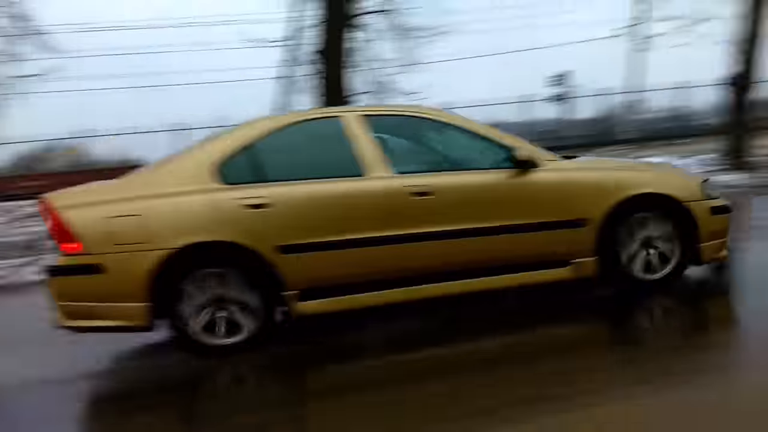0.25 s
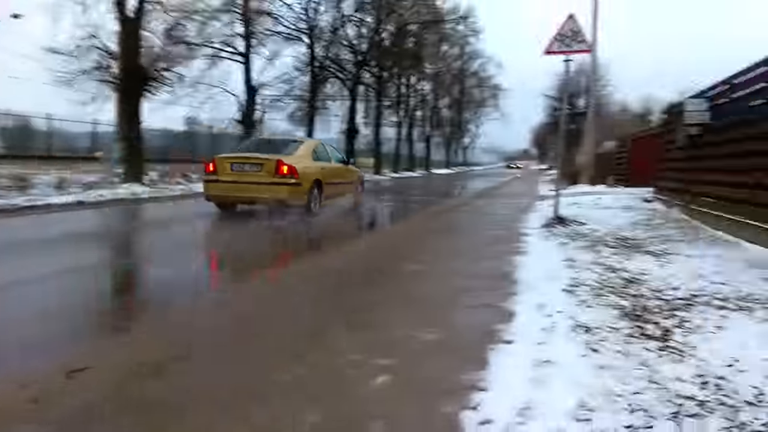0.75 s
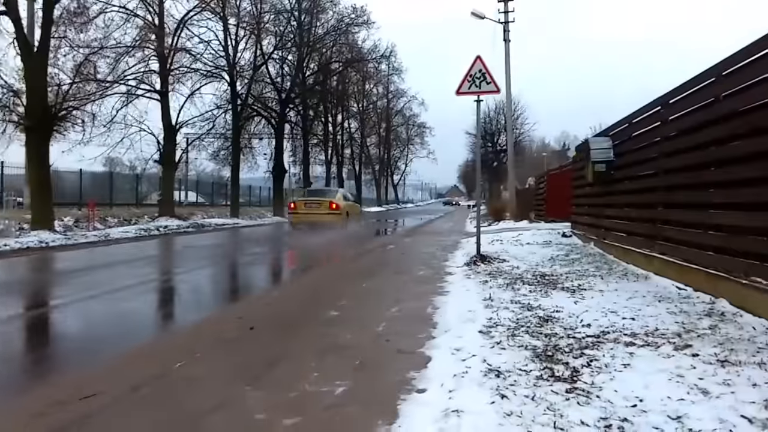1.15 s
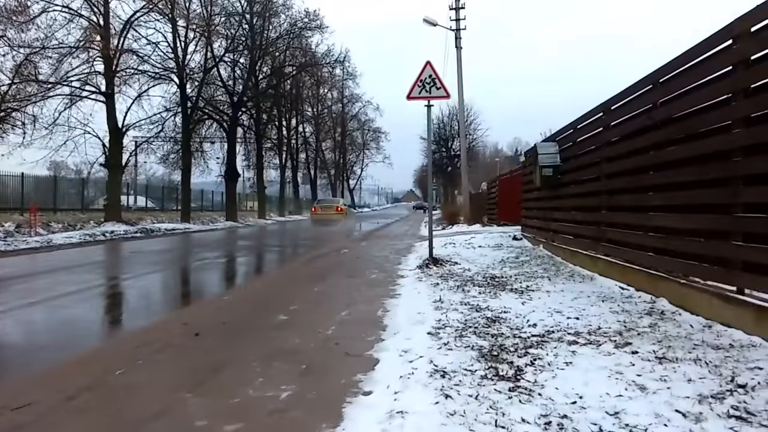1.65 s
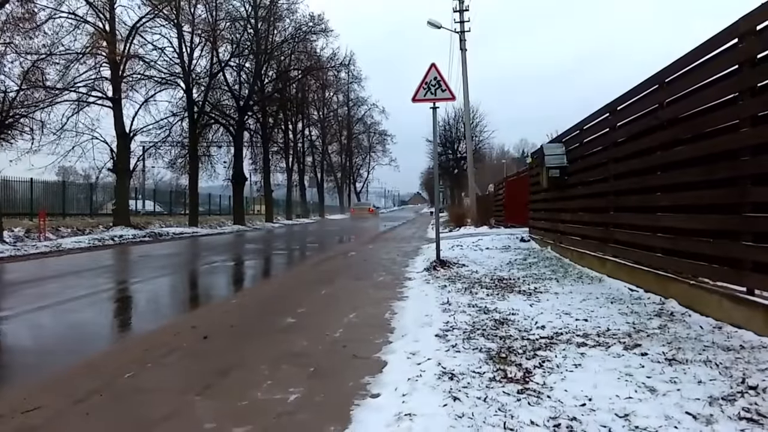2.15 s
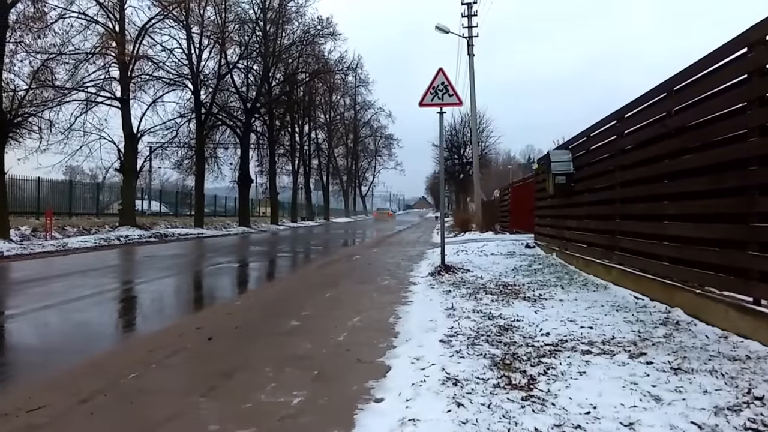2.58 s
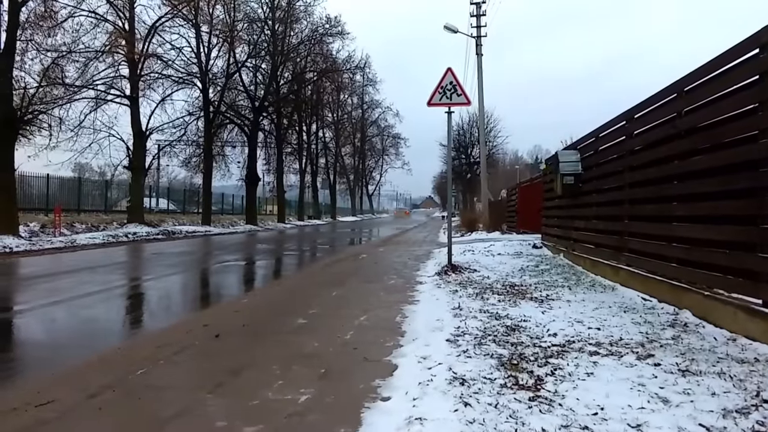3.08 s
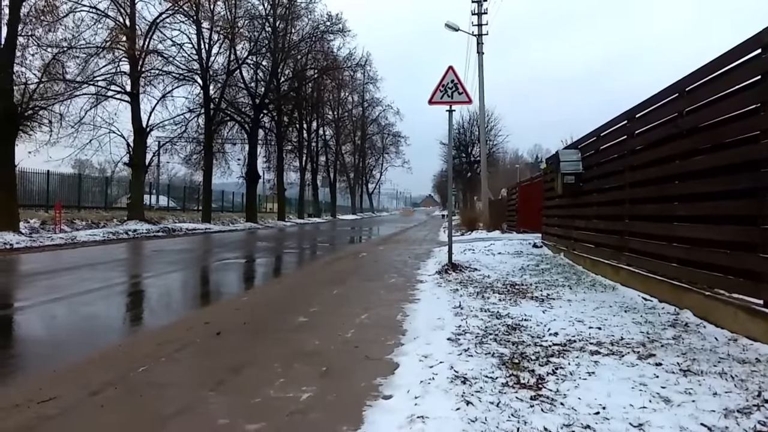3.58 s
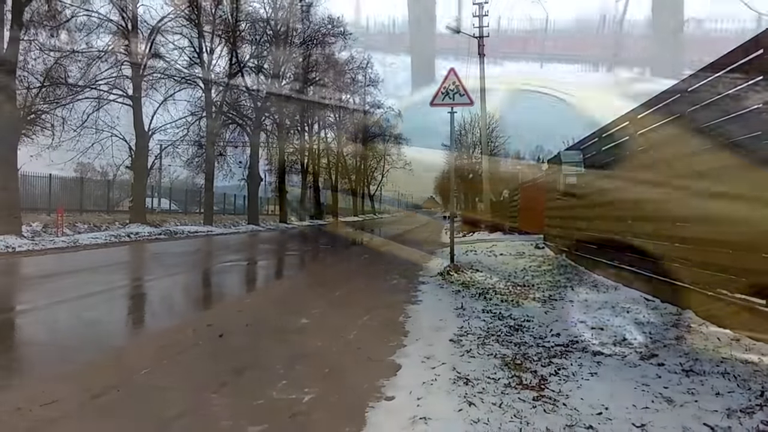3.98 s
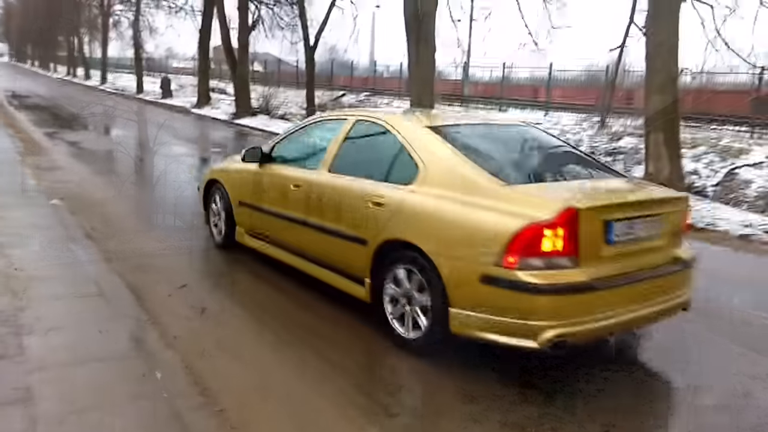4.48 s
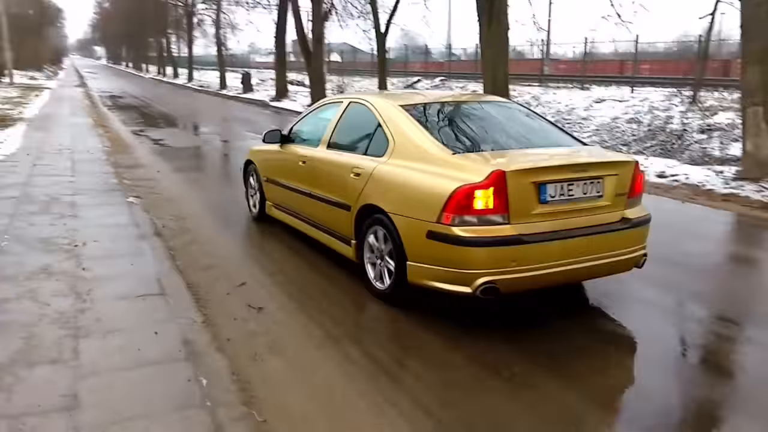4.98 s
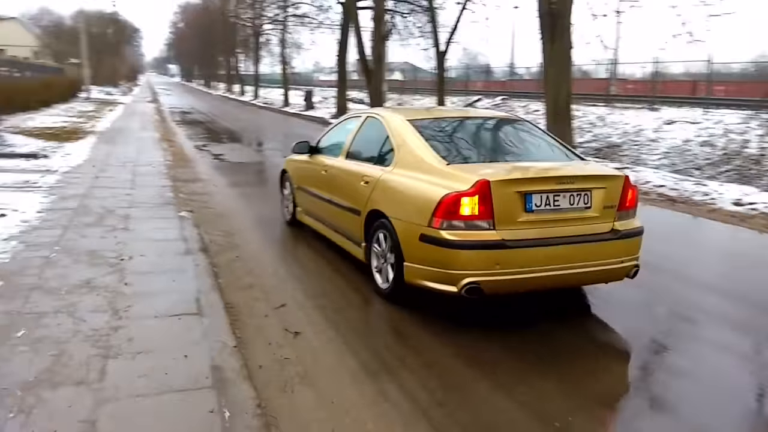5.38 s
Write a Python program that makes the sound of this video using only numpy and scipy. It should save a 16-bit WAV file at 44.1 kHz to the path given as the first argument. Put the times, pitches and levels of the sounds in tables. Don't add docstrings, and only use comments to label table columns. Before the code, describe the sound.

Outdoors on a wet roadside, a five-cylinder diesel with an open exhaust passes a few metres from the microphone with tyre spray and a loud growl. Its pitch dips, then climbs as it accelerates away, raspier and duller, until the throttle lifts. Wind buffets the microphone, and the sound crossfades to the car close up, idling and revving hard.

```python
import sys
import numpy as np
from scipy import signal
from scipy.io import wavfile
from scipy.ndimage import uniform_filter1d, map_coordinates

SR = 44100
rng = np.random.default_rng(int(sys.argv[2]) if len(sys.argv) > 2 else 0)


def field_ratio(decibels):
    return 10 ** (np.asarray(decibels, dtype=float) / 20)


def store_pcm(level_fs):
    pcm = np.round(np.clip(level_fs, -1, 1) * 32767).astype(np.int16)
    wavfile.write(sys.argv[1], SR, np.atleast_2d(pcm).T)


N = 248280

AWAY_S, AWAY_LENGTH_S = .75, .5
LIFT_S = 3.3
BEND_S = 4.1


def evened(x):
    return x / np.sqrt(np.mean(x ** 2) + 1e-20)


def read(points, hz):
    f, value = np.transpose(points)
    return np.interp(np.log(hz + 1), np.log(f + 1), value)


def curves(rows, t=None):
    s, *columns = np.transpose(rows)
    at = np.arange(N) / SR if t is None else t
    return [np.interp(at, s, c) for c in columns]


def bump(s, wide_s):
    return np.exp(-((np.arange(N) / SR - s) / wide_s) ** 2)


def ramp(s, length_s):
    return np.clip((np.arange(N) / SR - s) / length_s, 0, 1)


def sine(turns):
    return np.sqrt(2) * np.sin(2 * np.pi * turns)


def resonate(x, hz, width):
    turn = np.exp(2j * np.pi * np.cumsum(hz * np.ones(N)) / SR)
    r = np.exp(-np.pi * width / SR)
    return 2 * (turn * signal.lfilter([1 - r], [1, -r], x / turn)).real


def noise(spectrum, patchy_db, flicker_db):
    frames, hz = N // 256 + 5, np.fft.rfftfreq(1024, 1 / SR)
    patches = uniform_filter1d(rng.standard_normal((frames, 513)), size=20, axis=0)
    patches = evened(uniform_filter1d(patches, size=8, axis=1))
    flicker = evened(uniform_filter1d(rng.standard_normal((frames, 1)), size=7, axis=0))
    z = rng.standard_normal((2, frames, 513)) + 1j * rng.standard_normal((2, frames, 513))
    z = z * field_ratio(read(spectrum, hz) + patchy_db * patches + flicker_db * flicker)
    return evened(signal.istft(z.transpose(0, 2, 1), nperseg=1024, noverlap=768)[1][:, :N])


def wind():
    # (time [s], peak [dB], length [s])
    gust_table = [(0.133, -36.5, 0.18), (0.796, -49, 0.048), (1.258, -44, 0.17), (1.462, -43, 0.052),
                  (1.716, -44, 0.21), (2.3, -54.5, 0.23), (3.145, -52, 0.021), (4.05, -49, 0.24),
                  (4.346, -45, .17), (4.62, -43, .1), (4.86, -47, 0.2), (5.194, -58, 0.23),
                  (5.422, -59, 0.14)]
    gusts = field_ratio(-70) + sum(field_ratio(db) * bump(s, length) for s, db, length in gust_table)
    rumble = [(25, -32), (70, 4.5), (140, -5.5), (300, -14.5), (500, -51), (1000, -74)]  # (Hz, dB)
    return gusts * field_ratio(7.5) * noise(rumble, 0.2, 1.8)


def buffets():
    # (time [s], peak [dB], frequency [Hz])
    buffet_table = [(1.81, -40, 75), (1.995, -46, 140), (2.05, -46, 140), (2.155, -47, 120),
                    (2.325, -41, 120), (2.46, -42, 100), (2.62, -46, 120), (2.765, -42, 140),
                    (3.04, -46, 130), (3.15, -45, 110), (3.555, -47, 115), (3.765, -47, 110),
                    (4.198, -28, 130), (4.234, -25, 100), (4.272, -22, 105), (4.3545, -19, 210),
                    (4.376, -19, 260), (4.3865, -24, 200), (4.3965, -22, 230), (4.41, -28, 130),
                    (4.434, -28, 160), (4.466, -27, 75), (4.5155, -24, 120), (4.533, -23, 150),
                    (4.5435, -25, 170), (4.577, -25, 170), (4.7, -25, 150), (4.77, -24, 200),
                    (4.865, -22, 200)]
    half_cycles, trim_db = 0.51, -1
    out, t = np.zeros(N), np.arange(-441, 1764) / SR
    for s, db, hz in buffet_table:
        swell = np.exp(-((t * hz - half_cycles) / half_cycles) ** 2)
        push = swell * np.sin(2 * np.pi * hz * t)
        out[round((s + t[0]) * SR):][:len(t)] += field_ratio(db + trim_db) * push
    return out


def knocks():
    # (time [s], peak [dB], pitch [Hz], t60 [s])
    joints = [
        (2.921, -19, 1383, 0.13),
        (3.644, -14, 1223, 0.035),
        (4.682, -17, 1650, 0.017),
        (4.766, -16.5, 1800, 0.027),
        (5.11, -16, 2260, 0.017),
    ]
    out, t = np.zeros(N + SR), np.arange(SR // 4) / SR
    start = np.sin(np.pi / 2 * np.minimum(t / .002, 1)) ** 2
    for s, db, hz, t60 in joints:
        ring = field_ratio(db - 60 * t / t60) * np.sin(2 * np.pi * hz * t) * start
        out[round(s * SR):][:len(t)] += ring
    return out[:N]


def road_echo(x, extra_ms, strength):
    late = np.arange(N) - extra_ms * SR / 1000
    dull = signal.filtfilt(*signal.butter(2, 2100., fs=SR), x)
    return x + strength * np.array([map_coordinates(v, [late], order=1) for v in dull])


def growl(rate, pipe, uneven, rough_db, jitter):
    # (strength [dB], lateness [share of the firing gap])
    cylinders = [(-1.5, 0.048), (0.5, 0.088), (-0.5, 0.061), (-3.5, -0.058), (-6.5, -0.016)]
    turns, away = np.cumsum(rate) / SR, ramp(AWAY_S, AWAY_LENGTH_S)
    lifted = ramp(LIFT_S - .25, 0.25)
    count = np.arange(1, int(turns[-1]))
    runners = np.array(cylinders)[count % len(cylinders)].T
    strength_db, late = np.interp(count, turns, uneven * np.ones(N)) * runners
    chance = rng.standard_normal((1000, 2))[:len(count)]
    at = np.interp(count + late + jitter * chance[:, 0], turns, np.arange(N)).astype(int)
    pulses = np.zeros(N)
    pulses[at] = field_ratio(strength_db + rough_db * chance[:, 1])
    pulses = pulses - resonate(pulses, rate, 30)
    rung = np.zeros(N)
    for k, (hz, width, db, away_db, lift_db) in enumerate(pipe):
        mode = resonate(resonate(pulses, hz, 2 * width), hz, 2 * width)
        rung += (-1) ** k * field_ratio(db + away_db * away + lift_db * lifted) * mode
    rung = signal.sosfilt(signal.butter(4, [60., 760.], "band", fs=SR, output="sos"), rung)
    return rung / np.sqrt(uniform_filter1d(rung ** 2, size=8820) + 1e-12)


def car(rate, tone, low, mid, high, pipe, roar, echo, gate, uneven, rough_db, jitter, patchy_db, near_db,
        colour, pipe_echo):
    # (frequency [Hz], level [dB])
    spray_spectrum = [(1500, 9), (4000, 6), (7000, 3), (8300, 7), (8800, 4.5), (11000, 6.5), (14500, 0),
                      (15600, -6), (16000, -2)]
    turns = np.cumsum(rate) / SR
    puffs = 1 + gate * np.cos(2 * np.pi * turns)
    body = field_ratio(low) * growl(rate, pipe, uneven, rough_db, jitter)
    pipe_sound = field_ratio(tone) * sine(turns) + road_echo(body[None], echo[0], pipe_echo)
    rush = field_ratio(mid) * puffs * colour(noise(roar, patchy_db, 0.55))
    spray = noise(spray_spectrum, 1.7, .8)
    fizz = signal.sosfilt(signal.butter(4, 10500., "high", fs=SR, output="sos"), spray)
    spray = spray + (field_ratio(0.21 * (high - near_db)) - 1) * fizz
    return np.vstack([pipe_sound, road_echo(rush, *echo) + field_ratio(high) * spray])


def revving():
    # (time [s], throttle [dB])
    throttle_table = [(4.0, -37), (4.45, -43), (4.55, -31), (4.8, -17.5), (5.0, -9.5), (5.17, -8.5),
                      (5.27, -21.5), (5.38, -16), (5.45, -20), (5.52, -10), (5.57, -18), (5.6, -22),
                      (5.63, -14)]
    # (time [s], firing rate [1/s])
    speed = [
        (4.5, 42),
        (4.62, 48),
        (5.1, 112.5),
        (5.2, 122.5),
        (5.3, 122.8),
        (5.45, 118),
        (5.63, 105),
    ]
    # (frequency [Hz], level [dB])
    boom = [(42, -25), (48, -23), (57, -20), (70, -15), (84, -9), (98, -14), (113, -22.5), (123, -19.5)]
    # (frequency [Hz], level [dB])
    overtone = [(84, -3.5), (120, -16), (160, -17), (205, -28), (250, -19.5), (285, -22.5), (315, -23),
                (370, -32), (420, -36), (460, -22), (500, -54), (700, -53)]
    # (centre [Hz], width [Hz], level [dB], change from behind [dB], change off throttle [dB])
    pipe = [(110, 93, -2.5, 0, 0), (200, 30, -8, 0, 0), (250.4, 9.6, 10.5, 0, 0), (315, 12, -0.5, 0, 0),
            (386, 28, 4.5, 0, 0), (458, 9.3, 4.5, 0, 0), (523, 13, -3.5, 0, 0), (600, 12, -17, 0, 0)]
    # (frequency [Hz], level [dB])
    roar = [(40, -5), (250, 6), (480, 2.5), (700, -8.5), (1250, -11.5), (1600, -2), (2050, -10),
            (3100, -10.5), (3600, -15.5), (5500, -34.5), (9000, -48), (16000, -68)]
    idle_roar_db, idle_spray_db = -25, -44
    t, (throttle,), (rate,) = np.arange(N) / SR, curves(throttle_table), curves(speed)
    rasp = 1.5 * np.log2(rate / rate[0]) + 0.24 * throttle
    echo = (0.68, np.clip(0.27 - 0.052 * (t - 4), 0, 1))
    tone = read(boom, rate) + 0.15 * (throttle + 10) - 14 * (1 - ramp(4.45, .1))
    mid = idle_roar_db + rasp + 6.5 + 4.5 * (ramp(4.64, .06) - 1)
    sound = car(rate, tone, throttle - 4.5, mid, idle_spray_db + rasp, pipe, roar, echo, gate=.4, uneven=.6,
                rough_db=1.5, jitter=.015, patchy_db=1.5, near_db=-47.5, colour=evened, pipe_echo=echo[1])
    turns = np.cumsum(rate) / SR
    push_db = .6 * (throttle + 14) - 14 * (1 - ramp(4.48, .14))
    overtones = sum(field_ratio(read(overtone, k * rate) + push_db) * sine(k * turns) for k in range(2, 8))
    return sound + overtones * np.array([[1], [0], [0]])


def rasping(rush):
    # (time [s], ringing band [Hz], its strength [gain], treble [dB])
    rasp_table = [(0, 1770, 0.55, 6), (.45, 1980, 0.64, 1.5), (.7, 1920, 0.033, 0.5), (1.2, 1780, 0.19, 2),
                  (1.5, 1800, 1, -3), (1.95, 1880, 1.1, -0.5), (2.3, 2070, 1.86, -1),
                  (2.9, 1955, 0.7, -4.5), (3.1, 1900, 1.14, 0), (3.25, 1570, 1.17, -3),
                  (3.55, 1640, 1.04, 1.5), (3.72, 2770, 0.37, 4), (4.0, 2760, 0.93, 4),
                  (4.3, 1700, 0.58, 2)]
    hz, ring, treble_db = curves(rasp_table)
    rumble_db = -6.5 * bump(4.14, 0.42) + 1 * ramp(BEND_S, 0.22)
    treble = signal.sosfiltfilt(signal.butter(2, 2400, "high", fs=SR, output="sos"), rush)
    rumble = signal.sosfiltfilt(signal.butter(2, 830, fs=SR, output="sos"), rush)
    rush = rush + (field_ratio(treble_db) - 1) * treble + (field_ratio(rumble_db) - 1) * rumble
    rush = rush + 0.39 * bump(1.9, 0.57) * resonate(rush, 1260, 161)
    return rush + np.maximum(ring, 0) * resonate(rush, hz, 433)


def passing():
    # (time [s], level [dB])
    loudness = [(0, -20), (.15, -16.5), (.5, -16), (.62, -11), (.9, -13), (1.5, -14.5), (2.0, -18.5),
                (2.45, -20.5), (2.9, -17), (3.3, -25), (3.5, -24.5), (3.9, -28), (4.2, -33), (4.4, -34)]
    # (time [s], firing rate [1/s])
    speed = [
        (0, 129.5),
        (.2, 129.6),
        (.46, 125),
        (.62, 123.2),
        (.85, 127),
        (1.05, 126.2),
        (3.0, 146),
        (4.4, 143.2),
    ]
    # (time [s], gain [dB])
    tailpipe = [(0, 10), (.1, 11.5), (.2, 10.5), (.32, 14.5), (.42, 12.5), (.56, 9.5), (.63, 11.5), (.7, 7),
                (.9, 0), (1.2, 3.5)]
    # (time [s], level [dB])
    splash = [(0, -19.5), (.12, -15), (.4, -23.5), (.75, -27.5), (1.25, -32.5), (1.7, -33.5), (1.95, -39),
              (2.3, -46), (2.8, -47.5), (3.1, -52.5), (3.5, -54.5), (3.9, -53), (4.4, -64)]
    # (time [s], extra delay [ms])
    echo_path = [(0, 7.0), (.12, 5.9), (.2, 4.7), (.3, 4.25), (.45, 3.5), (.6, 2.75), (.8, 2.08),
                 (1.0, 1.62), (1.15, 1.36), (1.35, 1.05), (1.55, .88), (1.85, .75), (3.05, .76),
                 (3.25, .66), (4.4, .68)]
    # (centre [Hz], width [Hz], level [dB], change from behind [dB], change off throttle [dB])
    pipe = [(150, 97, -7, 3.5, -9), (253.6, 54, 2.5, -4.5, 2), (396, 87, 1, 0.5, 6.5),
            (464, 98, -1.5, 6, 3), (624, 190, -24, 18.5, 7)]
    # (frequency [Hz], level [dB])
    roar = [(40, -22), (150, -42), (320, -3), (520, 5.5), (750, 3.5), (1300, 2), (1900, 1.5), (2650, -2.5),
            (3400, -0.5), (4200, -8.5), (5500, -22), (8300, -28), (8900, -53), (16000, -67)]
    t, (level,), (rate,) = np.arange(N) / SR, curves(loudness), curves(speed)
    lifted = ramp(LIFT_S, 0.16)
    dip_db = -10 * bump(0.42, 0.19)
    tone = level + .5 - 1.4 * t + dip_db - 2.5 * lifted
    low = level - 9 + curves(tailpipe)[0] + 1.92 * t - 1 * lifted
    high, = curves(splash)
    extra_ms, = curves(echo_path)
    echo = (extra_ms, .42 + 0.017 * ramp(BEND_S, .2))
    uneven = .5 + (.95 - .5) * ramp(AWAY_S, AWAY_LENGTH_S)
    whine_turns = 18 / 5 * np.cumsum(rate) / SR
    whine = field_ratio(level - 4) * bump(2.6, 0.62) * np.sin(2 * np.pi * whine_turns)
    sound = car(rate, tone, low, level + .5, high - 2.5, pipe, roar, echo, gate=.14, uneven=uneven,
                rough_db=.9, jitter=.012, patchy_db=.9, near_db=-29, colour=rasping, pipe_echo=.62)
    return sound + whine * np.array([[1], [0], [0]])


def ports(x):
    # (time [s], lead of the left port [ms], share of direct sound [0-1])
    bearing = [(0, 0.18, 0.7), (.4, 0.14, 0.7), (.65, .11, .95), (2, 0.1, 0.85), (3.5, 0.07, 0.8),
               (4.1, 0.07, .9), (4.4, 0.03, 0.65), (5.6, 0.02, 0.65)]
    # (frequency [Hz], likeness [0-1])
    likeness = [(60, .97), (150, .998), (300, .98), (800, .95), (1200, .93), (2000, .85), (3500, .75),
                (4500, .5), (12000, .4)]
    # (frequency [Hz], difference [dB])
    tilt = [(200, .1), (320, -1.3), (440, 4.5), (520, 3), (680, -.8), (880, 5), (1170, -4), (1320, 7),
            (2000, 1.1), (3100, 5.5), (4200, 12), (6000, -5), (8000, -3), (12000, -3), (15600, -9)]
    # (frequency [Hz], gain [dB])
    near_shade = [(70, -1.9), (100, -1.7), (125, 0), (300, -1), (340, -1.5), (390, -4), (480, -2.5),
                  (600, 0), (3000, 1)]
    # (frequency [Hz], gain [dB])
    far_shade = [(200, 0), (800, 0.7), (1200, -3), (2000, -0.5), (5000, -1.5), (10000, -1), (13000, -5)]
    far_s, near_s = 1.6, 4.4
    hz, t, (plain, direct, unrelated) = signal.stft(x, SR, nperseg=1024)
    lead_ms, share = curves(bearing, t)
    same = np.clip(read(likeness, hz)[:, None], 0, 1) ** (1 / np.clip(share, .1, 1) ** 2)
    log_gain = np.log(field_ratio(tilt[0][1] - read(tilt, hz)))
    turn = -signal.hilbert(np.r_[log_gain, log_gain[-2:0:-1]]).imag[:len(hz)]
    leak = .14 + .7 * np.exp(-(t / 1.0) ** 2)
    bass_alike = np.clip(hz[:, None] / 100 - 1.5, leak, 1)
    phase = turn[:, None] - 2 * np.pi * hz[:, None] * lead_ms / 1000
    path = np.exp(log_gain[:, None] + 1j * bass_alike * phase)
    far = np.clip(t - far_s, 0, 1) * (t < near_s)
    path = path * field_ratio(read(near_shade, hz)[:, None] * (t > near_s) + read(far_shade, hz)[:, None] * far)
    heard = np.sqrt(1 - same ** 2) * unrelated - same * direct - plain
    right = path / field_ratio(tilt[0][1]) * heard
    return signal.istft(np.array([plain + direct, right]), SR, nperseg=1024)[1][:, :N]


def scene():
    cars = (1 - ramp(4.35, 0.34)) * passing() + ramp(3.94, 0.43) * revving()
    return ports(cars) + knocks() + wind() + buffets()


def roll_off(x):
    return signal.sosfilt(signal.butter(12, 15800, fs=SR, output="sos"), x)


def record(dry):
    over = np.maximum(abs(dry) - .7, 0)
    squeezed = dry - np.sign(dry) * (over - .36 * np.tanh(over / .36))
    return roll_off(np.clip(squeezed, -1, 1))


dry = scene()
out = record(dry)
store_pcm(out)
```